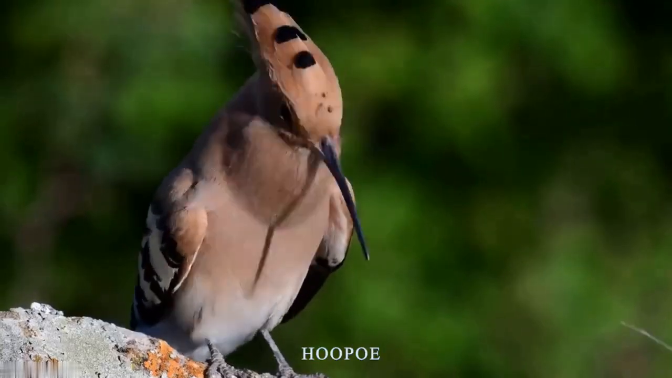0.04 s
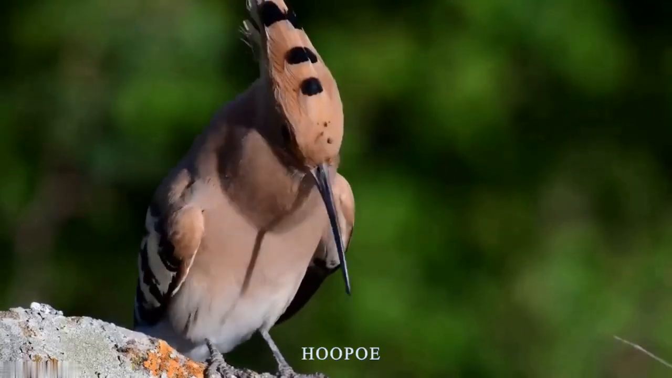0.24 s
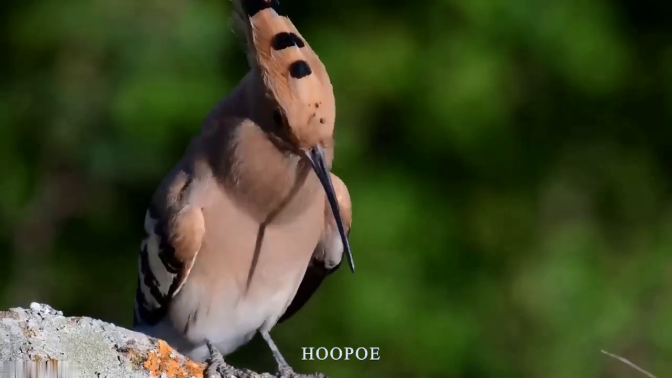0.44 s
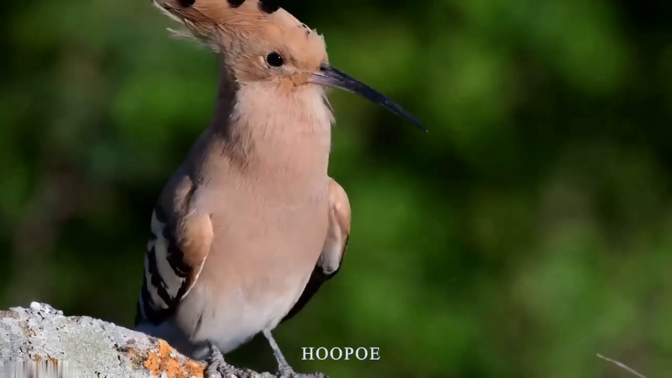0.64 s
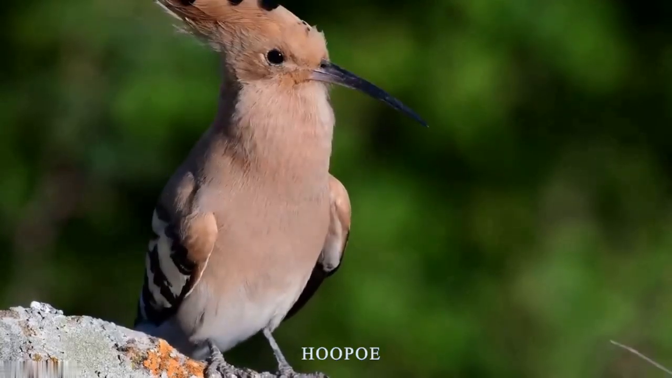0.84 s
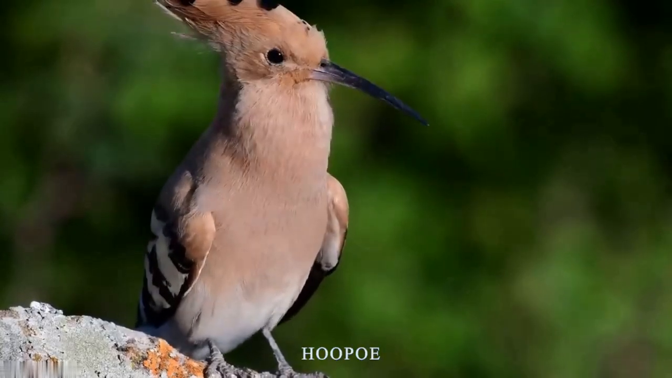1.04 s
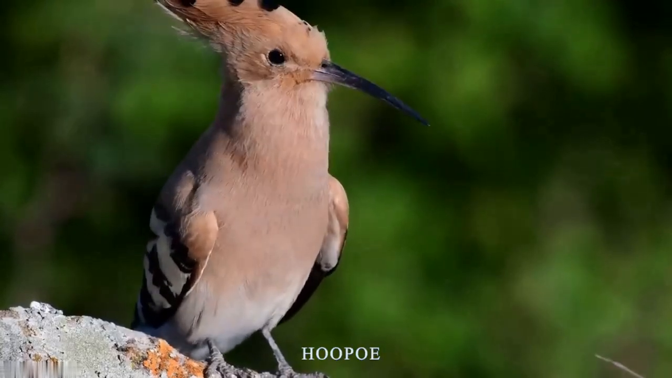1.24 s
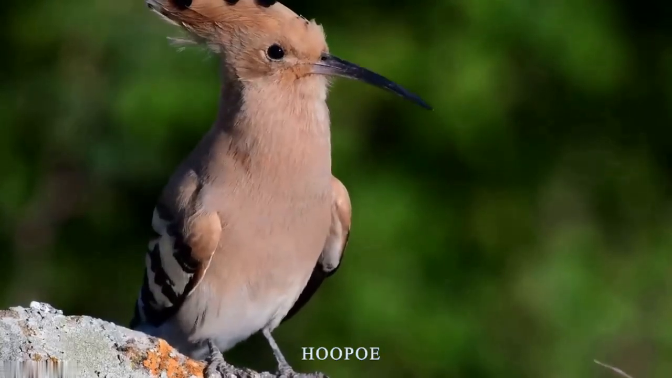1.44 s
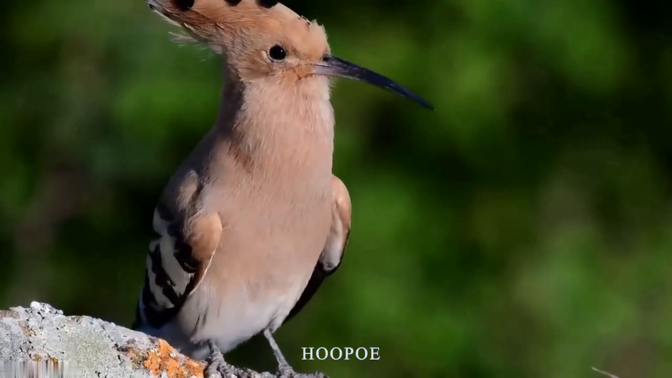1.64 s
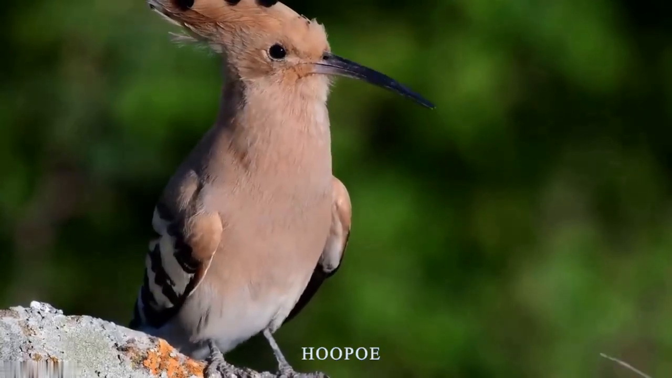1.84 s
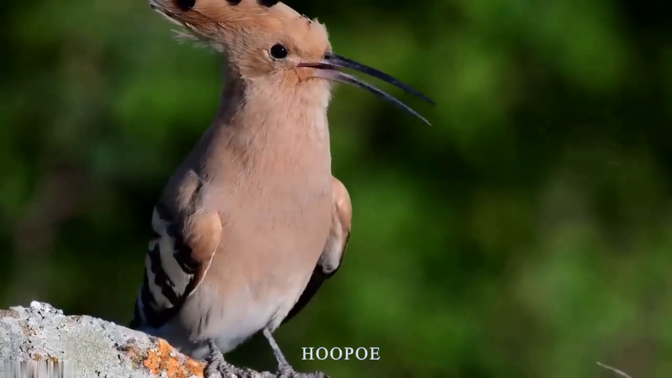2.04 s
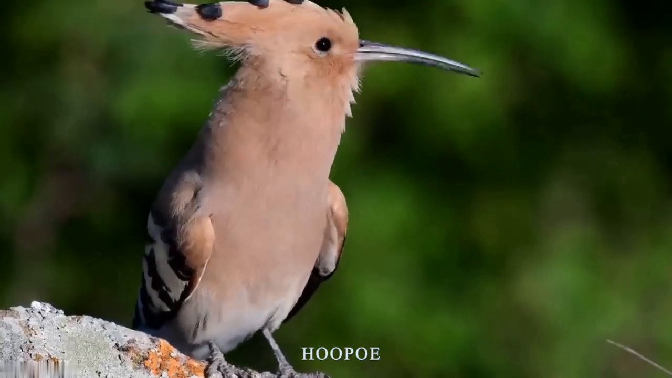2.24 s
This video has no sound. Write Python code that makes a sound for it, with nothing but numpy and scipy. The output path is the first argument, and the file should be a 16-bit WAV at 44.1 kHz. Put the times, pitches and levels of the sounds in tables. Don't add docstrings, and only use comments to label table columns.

```python
import sys
import numpy as np
from scipy import signal
from scipy.io import wavfile
from scipy.ndimage import uniform_filter1d

SR = 44100
rng = np.random.default_rng(int(sys.argv[2]) if len(sys.argv) > 2 else 0)


def ratio_of_db(decibels):
    return 10 ** (np.asarray(decibels, float) / 20)


def digitize_waveform(pressure):
    field = np.atleast_2d(pressure).T
    bounded = np.clip(field, -1, 1)
    quanta = np.round(bounded * 32767).astype(np.int16)
    wavfile.write(sys.argv[1], SR, quanta)


N = 101430

# swell starts in seconds, air runs out in seconds, level in dB, release stretch.
HOOTS = [
    (.2205, .311, -22.3, .75),
    (.42, .516, -20.6, 1.02),
    (.6295, .7255, -20.5, .98),
]
# time in seconds, pitch in Hz, level of the octave in dB.
THROAT = [
    [(.2, 565, -86.5), (.215, 616.5, -73.5), (.231, 669.2, -57), (.252, 667.8, -61), (.282, 660, -66),
     (.298, 650, -58.5), (.312, 627, -64)],
    [(.405, 583, -87), (.42, 626, -75), (.435, 664.8, -61), (.456, 661.7, -62), (.482, 672.3, -63),
     (.502, 667.5, -52.5), (.518, 660, -72)],
    [(.615, 578, -86.5), (.633, 626.4, -68.5), (.648, 651.2, -60), (.678, 660.2, -68), (.695, 669, -58),
     (.712, 673.6, -53), (.726, 668, -72.5)],
]
# delay in seconds, level in dB.
ECHOES = [(.047, -36), (.066, -39), (.125, -44.5), (.16, -46.5)]
SWELL_S, SOFT_START_S, RELEASE_S, SOFT_END_S = .031, .005, .0135, .0015
THIRD_DB, HOOT_PAN_DB = -47.5, -2.9
FIELD_T60_S, FIELD_DB = .35, -46

# first stroke in seconds, last stroke in seconds, level in dB, pan in dB.
NEAR_CHIRPS = [(.173, .268, -53, -5), (.475, .569, -56.5, -5), (.765, .861, -53, -5),
               (1.05, 1.142, -50, -5), (1.328, 1.43, -51, -6.5), (1.608, 1.7, -47, -8),
               (1.883, 1.976, -47, -7.5), (2.152, 2.244, -52.5, -6)]
FAR_CHIRPS = [(-.045, .051, -63.5, -4), (.166, .253, -65, 0), (.392, .488, -68, -0.5),
              (.678, .77, -64, -1.5), (.965, 1.055, -63.5, -4), (1.202, 1.296, -61.5, -5),
              (1.468, 1.565, -63, -7), (1.715, 1.807, -63, -7), (1.98, 2.066, -70, -12),
              (2.26, 2.35, -67, 1)]
# place from first (0) to last (1), length in seconds, level in dB,
# pitch factor.
STROKES = [
    (0, .014, -5, .99),
    (0.295, .021, -2, 0.99),
    (0.629, .024, -1.5, 1),
    (1.006, .026, -2, 1),
]
NEAR_HZ, NEAR_SAG, FAR_HZ, FAR_SAG = 4796, 0.1, 4586, 0.1
SAG_BEND, STROKE_PEAK = 3.54, 1.08
TEETH_DB, CRICKET_WET_DB = 1.58, -20.5
SCRAPE_DB, SCRAPE_HZ = -23, 6600
STUMBLE_S, STUMBLE_LENGTH_S = 1.9045, .002

# start in seconds, length in seconds, level in dB, centre in Hz, pan in dB.
TICKS = [
    (0.38, .022, -56, 5830, -5),
    (0.754, .02, -56, 5500, -3),
    (2.101, 0.017, -52, 5330, -3.5),
]
# pitch factor, level in dB.
TICK_BANDS = [(.78, -10), (.92, 0), (1.04, 0.5), (1.1, -5)]
TICK_WIDTH_HZ, TICK_FALL, TICK_CLICKS_PER_S, TICK_WET_DB = 450, .06, 2500, -13
TICK_ECHO_S, TICK_ECHO_DB = (0.039, 0.06), -14.5

# start in seconds, time stretch, level in dB.
WHISTLES = [
    (1.023, 1, -60.5),
    (2.104, 1.08, -63.5),
]
# start in seconds, length in seconds, from Hz, to Hz, level in dB.
WHISTLE_PARTS = [
    (0, 0.027, 1670, 1820, 4.5),
    (0.026, 0.0086, 2010, 2010, 1),
    (0.037, 0.012, 1765, 1670, 5.5),
]
# start in seconds, length in seconds, from Hz, to Hz, level in dB.
BLIPS = [
    (1.092, 0.013, 830, 935, -64),
    (.012, 0.029, 330, 320, -64.5),
    (.016, .02, 240, 220, -65),
    (1.8965, .007, 4820, 4760, -61),
    (2.271, 0.0036, 2000, 1880, -50.5),
]
# pitch in Hz, width in Hz, level in dB.
CROAK_THROAT = [(1930, 300, 0), (2200, 180, -13), (1620, 180, -13), (6800, 1200, -13)]
CROAK_S, CROAK_DB, CROAK_PER_S, CROAK_PAN_DB = 2.258, -57, 420, -13

# pitch in Hz, level in dB per Hz.
AIR_COLOUR = [(530, -29), (900, -3), (2820, -6.5), (3800, -7.5), (4540, -6.5), (6050, -7), (15500, -14.5)]
# pitch in Hz, level in dB per Hz.
RUMBLE_COLOUR = [(12, -31), (20, -16.5), (85, 1), (113, -8.5), (172, -3.5), (424, -10), (619, -10.5),
                 (921, -17), (1500, -26), (1950, -52.5), (3300, -120)]
AIR_DB, RUMBLE_DB = -64.5, -63
# pitch in Hz, likeness (1 is identical).
LIKENESS = [(25, 0.67), (90, 0.8), (200, 0.38), (500, 0.29), (1200, .08), (6100, 0.034), (8000, 0.13),
            (8600, .97)]

# pitch in Hz, width in Hz, drift in Hz.
HOUSING_DIPS = [(2616, 430, 21), (7730, 800, 45)]
# pitch in Hz, how far in dB the insects must be above their median.
WIDE_TOPS = [(6250, -3), (6900, 7), (8300, 15)]


def evened(x):
    return x / np.sqrt(np.mean(x ** 2) + 1e-20)


def read(points, hz):
    f, value = np.transpose(points)
    return np.interp(np.log(hz + 1), np.log(f + 1), value)


def add(mix, s, sound, pan_db, lag=0):
    for side, late, db in ((0, lag, pan_db / 2), (1, 0, -pan_db / 2)):
        at = round(s * SR) + late
        part = mix[side, max(at, 0):max(at + len(sound), 0)]
        heard = sound[max(-at, 0):]
        part += ratio_of_db(db) * heard[:len(part)]


def resonate(x, hz, width_hz):
    turn = np.exp(2j * np.pi * np.cumsum(hz * np.ones(len(x))) / SR)
    r = np.exp(-np.pi * width_hz / SR)
    return 2 * (turn * signal.lfilter([1 - r], [1, -r], x / turn)).real


def field(x, wet_db, t60):
    t = np.arange(SR // 2) / SR
    fade = ratio_of_db(-60 * t / t60) * np.minimum(t / 0.0074, 1)
    tail = rng.standard_normal((2, len(t))) * fade
    tail = tail / np.linalg.norm(tail[0])
    return x + ratio_of_db(wet_db) * signal.fftconvolve(x, tail, axes=1)[:, :N]


def glide(length, from_hz, to_hz):
    u = np.arange(0, length, 1 / SR) / length
    turn = 2 * np.pi * np.cumsum(from_hz + (to_hz - from_hz) * u) / SR
    return np.sqrt(2) * np.sin(np.pi * u) ** 0.5 * np.sin(turn)


def hoopoe():
    out = np.zeros((2, N))
    for (start, end, db, stretch), throat in zip(HOOTS, THROAT):
        t = np.arange(start - .03, end + .012, 1 / SR)
        s, *rest = np.transpose(throat)
        hz, octave_db = (uniform_filter1d(np.interp(t, s, v), size=300) for v in rest)
        since = SOFT_START_S * np.logaddexp(0, (t - start) / SOFT_START_S)
        left = SOFT_END_S * np.logaddexp(0, (end - t) / SOFT_END_S)
        closing = 1 - np.exp(-left / (stretch * RELEASE_S))
        effort = ratio_of_db(db) * (1 - np.exp(-since / SWELL_S)) * closing
        turn = 2 * np.pi * np.cumsum(hz) / SR
        note = effort * (np.sin(turn) + ratio_of_db(THIRD_DB) * np.sin(3 * turn))
        note = note + ratio_of_db(octave_db) * closing ** 0.25 * np.sin(2 * turn)
        add(out, t[0], note, HOOT_PAN_DB)
        for delay, echo_db in ECHOES:
            add(out, t[0] + delay, ratio_of_db(echo_db) * note, 0)
    return field(out, FIELD_DB, FIELD_T60_S)


def cricket(chirps, top_hz, sag, lag):
    out = np.zeros((2, N))
    for first, last, db, pan_db in chirps:
        for place, length, stroke_db, pitch in STROKES:
            u = np.arange(0, length, 1 / SR) / length
            teeth = uniform_filter1d(uniform_filter1d(rng.standard_normal(2000), size=60), size=60)
            teeth = evened(teeth)[:len(u)]
            scrape = resonate(rng.standard_normal(2000), SCRAPE_HZ, 2400)
            scrape = ratio_of_db(SCRAPE_DB) * evened(resonate(scrape, SCRAPE_HZ, 2400))[:len(u)]
            hz = top_hz * pitch * (1 - sag * u ** SAG_BEND)
            ring = np.sin(2 * np.pi * np.cumsum(hz) / SR)
            push = np.sin(np.pi * u ** STROKE_PEAK) ** .8 * ratio_of_db(db + stroke_db + 2 + TEETH_DB * teeth)
            middle = first + place * (last - first)
            add(out, middle - length / 2, push * (ring + scrape), pan_db, lag)
    from_stumble = (np.arange(N) / SR - STUMBLE_S) / STUMBLE_LENGTH_S
    out = out * (1 - np.exp(-from_stumble ** 4))
    return field(out, CRICKET_WET_DB, .12)


def ticks():
    out = np.zeros((2, N))
    for s, length, db, hz, pan_db in TICKS:
        u = np.arange(0, length, 1 / SR) / length
        chance, size = rng.random((3000, 2))[:len(u)].T
        clicks = (chance < TICK_CLICKS_PER_S / SR) * (size - .5) + 0.11 * (size - .5)
        band = hz * (1 + TICK_FALL * (.5 - u))
        chip = np.zeros(len(u))
        for factor, band_db in TICK_BANDS:
            once = resonate(clicks, factor * band, TICK_WIDTH_HZ)
            chip += ratio_of_db(band_db) * resonate(once, factor * band, TICK_WIDTH_HZ)
        chip = ratio_of_db(db) * evened(chip) * np.sin(np.pi * u) ** .9
        add(out, s, chip, pan_db)
        for delay in TICK_ECHO_S:
            add(out, s + delay, ratio_of_db(TICK_ECHO_DB) * chip, 0)
    return field(out, TICK_WET_DB, 0.11)


def rough_call():
    t = np.arange(0, .06, 1 / SR)
    wobble = evened(uniform_filter1d(rng.standard_normal(len(t)), size=100))
    turns = np.cumsum(CROAK_PER_S * ratio_of_db(4 * wobble)) / SR
    pulses = np.diff(np.floor(turns), prepend=0) * rng.standard_normal(len(t))
    drive = pulses + 0.17 * rng.standard_normal(len(t))
    croak = np.zeros(len(t))
    for hz, width_hz, db in CROAK_THROAT:
        croak += ratio_of_db(db) * evened(resonate(resonate(drive, hz, width_hz), hz, 2 * width_hz))
    return ratio_of_db(CROAK_DB) * croak * np.minimum(t / .002, 1)


def far_birds():
    out = np.zeros((2, N))
    for start, stretch, db in WHISTLES:
        for s, length, from_hz, to_hz, part_db in WHISTLE_PARTS:
            note = ratio_of_db(db + part_db) * glide(length * stretch, from_hz, to_hz)
            add(out, start + s * stretch, note, -1.5, lag=17)
    for s, length, from_hz, to_hz, db in BLIPS:
        add(out, s, ratio_of_db(db) * glide(length, from_hz, to_hz), 0)
    add(out, CROAK_S, rough_call(), CROAK_PAN_DB, lag=4)
    return field(out, -22, 0.18)


def air(colour, level_db, patchy_db):
    frames, hz = N // 256 + 5, np.fft.rfftfreq(1024, 1 / SR)
    a, b, c, d, patches = rng.standard_normal((frames, 513, 5)).T
    patches = evened(uniform_filter1d(uniform_filter1d(patches, size=30, axis=0), size=8, axis=1))
    same = np.clip(read(LIKENESS, hz), -1, 1)[:, None]
    left = a + 1j * b
    right = same * left + np.sqrt(1 - same ** 2) * (c + 1j * d)
    swell_db = patchy_db * patches + .45 * evened(patches.mean(0))
    z = np.array([left, right]) * ratio_of_db(read(colour, hz)[:, None] + swell_db)
    return ratio_of_db(level_db) * evened(signal.istft(z, nperseg=1024, noverlap=768)[1][:, :N])


def scene():
    near = cricket(NEAR_CHIRPS, NEAR_HZ, NEAR_SAG, lag=1)
    far = cricket(FAR_CHIRPS, FAR_HZ, FAR_SAG, lag=1)
    floor = air(AIR_COLOUR, AIR_DB, patchy_db=.6) + air(RUMBLE_COLOUR, RUMBLE_DB, patchy_db=.4)
    return hoopoe() + near + far + ticks() + far_birds() + floor


def low_pass(x):
    return signal.sosfilt(signal.butter(12, 15640, fs=SR, output="sos"), x)


def record(dry):
    hz, t, z = signal.stft(dry, SR, nperseg=1024, noverlap=768)
    for dip_hz, width_hz, drift_hz in HOUSING_DIPS:
        centre = dip_hz + drift_hz * evened(uniform_filter1d(rng.standard_normal(len(t)), size=20))
        off = (2 * (hz[:, None] - centre) / width_hz) ** 2
        z = z * (off / (1 + off)) ** .7
    mid, side = (z[0] + z[1]) / 2, (z[0] - z[1]) / 2
    insects = mid[(hz > 4200) & (hz < 6500)]
    busy_db = 10 * np.log10((abs(insects) ** 2).mean(0))
    whim_db = 6 * np.repeat(rng.standard_normal(len(t)), 8)[:len(t)]
    busy_db = busy_db - np.median(busy_db) + whim_db
    for top_hz, over_db in WIDE_TOPS:
        side = side * np.where((hz[:, None] > top_hz) & (busy_db < over_db), .01, 1)
    both = np.array([mid + side, mid - side])
    wet = signal.istft(both, SR, nperseg=1024, noverlap=768)[1][:, :N]
    return low_pass(wet)


dry = scene()
out = record(dry)
digitize_waveform(out)
```